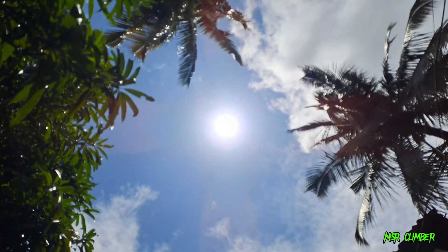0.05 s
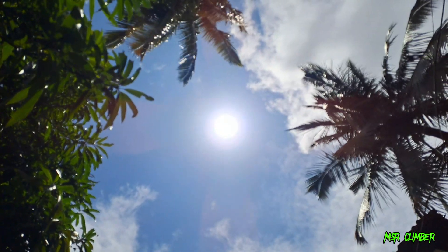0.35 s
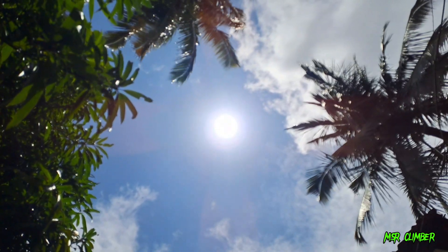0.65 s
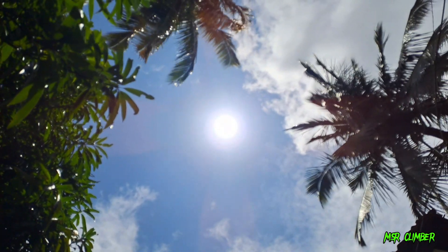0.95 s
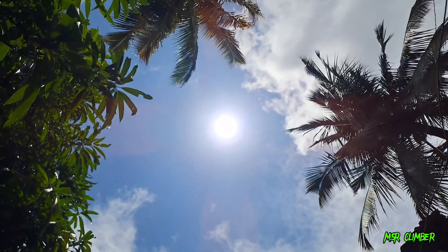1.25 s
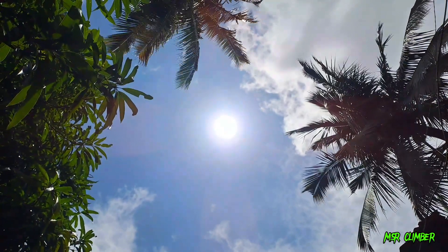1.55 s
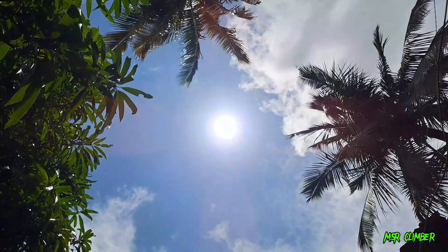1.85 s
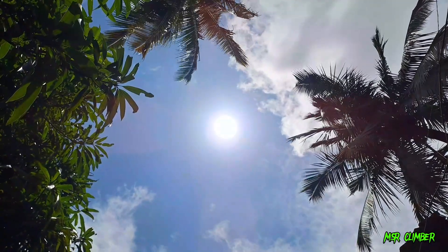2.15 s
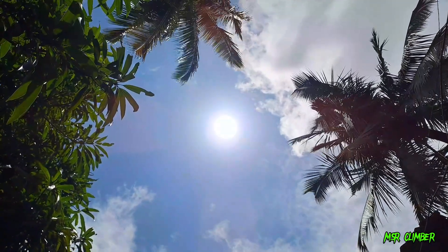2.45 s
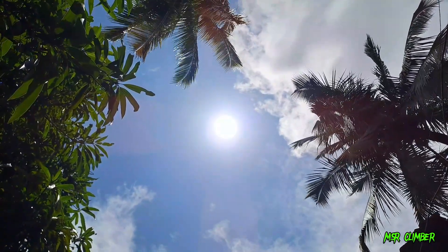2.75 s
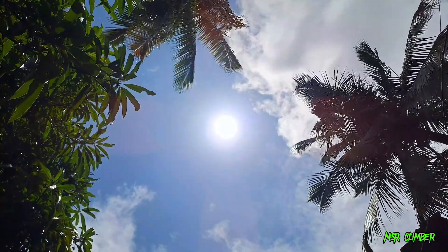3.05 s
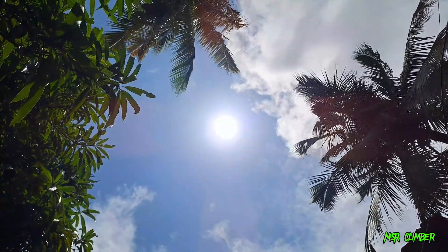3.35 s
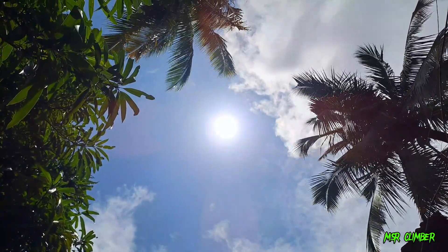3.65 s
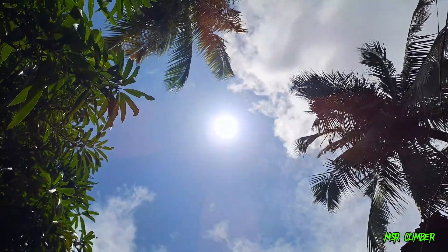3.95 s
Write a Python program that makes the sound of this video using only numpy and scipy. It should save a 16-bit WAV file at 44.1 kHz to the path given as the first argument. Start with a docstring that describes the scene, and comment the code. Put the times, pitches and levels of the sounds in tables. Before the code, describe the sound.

Wind rustles steadily through a grove, palm fronds hissing on the right and broad leaves softer on the left. Gusts rumble and thump on the microphone in turns, while a small distant bird pipes short notes.

```python
"""A grove in steady wind: palm fronds hiss on the right and broad leaves rustle more softly on the left,
over a far roar of air in the trees. Swirls of air rumble on the left and right microphones in turn,
and single swirls land as soft thumps. A small, distant bird pipes short notes, singly or in
falling runs, which echo among the trees."""
import sys
import numpy as np
from scipy import signal
from scipy.fft import rfft, irfft, next_fast_len
from scipy.io import wavfile
from scipy.ndimage import uniform_filter1d, map_coordinates

SR = 44100
rng = np.random.default_rng(int(sys.argv[2]) if len(sys.argv) > 2 else 0)


def master(y):
    """Save y as 16-bit WAV."""
    cut = np.clip(np.atleast_2d(y).T, -1, 1)
    pcm = np.round(cut * 32767)  # scale
    wavfile.write(sys.argv[1], SR, pcm.astype(np.int16))


N = 176400  # 4 seconds


def amp(db):
    """Turn decibels into a number to multiply a sound by."""
    return 10 ** (np.asarray(db) / 20)


def unit(x):
    """Scale a sound to an average strength (rms) of 1."""
    return x / np.sqrt(np.mean(x ** 2) + 1e-20)


def curve(rows):
    """Join (time, value) points with straight lines, one value per sample."""
    return np.interp(np.arange(N) / SR, *np.transpose(rows))


def wobble(per_second, samples=N):
    """A smooth curve that glides through so many random values a second."""
    return map_coordinates(rng.standard_normal(4096), [np.arange(samples) * per_second / SR], mode="wrap")


def filtered(x, gain_at):
    """Turn each frequency of a sound up or down by gain_at(frequency)."""
    size = next_fast_len(N + SR // 2)
    hz = np.fft.rfftfreq(size, 1 / SR)
    return irfft(rfft(x, size) * gain_at(hz), size)[..., :N]


def coloured(x, tone):
    """Shape a sound with a table of (frequency, level) points, then scale it to strength 1."""
    points_hz, db = np.transpose(tone)
    return unit(filtered(x, lambda hz: amp(np.interp(np.log(hz + 1), np.log(points_hz + 1), db))))


def patchy_noise(depth_db):
    """A hiss in which patches of low and high sound drift louder and softer."""
    grid = signal.stft(rng.standard_normal(N), nperseg=512)[2]
    patches = uniform_filter1d(rng.standard_normal(grid.shape), size=8, axis=0)  # smooth over frequency
    patches = uniform_filter1d(patches, size=16, axis=1)  # and over time
    noise = signal.istft(grid * amp(depth_db * unit(patches)), nperseg=512)[1]
    return unit(noise[:N])


def add(track, start_s, sound):
    """Mix a sound into a track at the given time."""
    at = round(start_s * SR) + np.arange(sound.shape[-1])
    inside = (at >= 0) & (at < N)
    track[..., at[inside]] += sound[..., inside]


# Tone of the far wind (frequency [Hz], relative level [dB])
ROAR_TONE = [(20, -5), (45, -10.5), (110, 0.5), (200, -3), (380, -4.5), (700, -8), (1100, -13.5),
             (1800, -39), (4000, -50)]

def far_roar(level_db=-45.5):
    """Wind in far trees makes a low, steady roar, the same on both sides."""
    return amp(level_db) * coloured(patchy_noise(depth_db=1.0), ROAR_TONE)


def among_trees(call, direct_db, echo_db, fade_s=0.7, build_s=0.014):
    """A call arrives directly and as an echo off trunks and treetops. Levels are (left, right)."""
    t = np.arange(SR) / SR
    fade = amp(-60 * t / fade_s)
    build = 1 - np.exp(-t / build_s)
    bounces = rng.standard_normal((2, SR)) * fade * build
    echo = signal.fftconvolve(call[None], bounces, axes=1)
    echo *= np.linalg.norm(call) / np.linalg.norm(echo, axis=1, keepdims=True)  # same energy as the call
    direct = np.pad(call, (0, SR - 1))
    return amp(direct_db)[:, None] * direct + amp(echo_db)[:, None] * echo


# The bird's notes, before they travel through the trees
# (time [s], pitch [Hz], level [dB], overtone level compared with the note [dB])
BIRD_NOTES = [(-.04, 3570, -42, -10), (.138, 3475, -37, -8), (.29, 3455, -40, -7), (.882, 3575, -29.5, -16),
              (1.622, 3615, -31.5, -8), (1.726, 3560, -29, -14), (2.67, 3640, -34.5, -9),
              (2.78, 3475, -36, -8), (3.08, 3645, -31, -11), (3.192, 3545, -33.5, -11),
              (3.33, 3490, -34, -12), (3.457, 3445, -39, -13), (3.875, 3575, -33, -9)]

def bird(note_s=0.06, fade_in_s=0.02, fade_out_s=0.03, flutter_db=2):
    """Each note is a short, fluttering whistle with a softer overtone at twice its pitch."""
    arch, sag, waver = 0.016, 0.006, 0.008  # shares of the pitch: low at both ends, falling, unsteady
    song = np.zeros((2, N))
    t = np.arange(SR // 8) / SR
    position = np.clip(t / note_s, 0, 1) * 2 - 1  # -1 at the note's start, +1 at its end
    fade = np.clip(t / fade_in_s, 0, 1) * np.clip((note_s - t) / fade_out_s, 0, 1)
    for start_s, hz, db, overtone_db in BIRD_NOTES:
        pitch = hz * (1 - arch * position ** 2 - sag * position + waver * wobble(170, len(t)))
        phase = 2 * np.pi * np.cumsum(pitch) / SR
        loudness = np.sqrt(2) * amp(db + flutter_db * wobble(170, len(t))) * fade
        whistle = loudness * np.sin(phase)
        overtone = loudness * amp(overtone_db) * np.sin(2 * phase)
        add(song, start_s, among_trees(whistle, direct_db=(-20.5, -2), echo_db=(-6, -4)))
        add(song, start_s, among_trees(overtone, direct_db=(-5, -8.5), echo_db=(-0.5, -1.5)))
    return song


# Single swirls of air (time [s], peak level [dB], pitch [Hz], side [0 left, 1 right])
AIR_THUMPS = [(.218, -21.5, 110, 0), (.292, -14, 108, 0), (0.491, -13.5, 112, 1), (0.671, -21, 63, 1),
              (0.769, -27.5, 60, 0), (1.417, -25, 60, 0), (1.638, -27, 55.4, 0), (2.281, -22.5, 55.4, 0),
              (2.378, -20.5, 94, 0), (2.592, -22, 72, 0), (2.868, -23, 77, 0), (3.402, -21.5, 64, 0),
              (3.602, -30, 54.6, 0), (3.643, -30, 68.5, 0)]

def air_thumps(half_width_cycles=0.28):
    """A sharp swirl hits one microphone and gives it one short swing of pressure."""
    mics = np.zeros((2, N))
    t = np.arange(-SR // 20, SR // 20) / SR
    for time_s, db, hz, side in AIR_THUMPS:
        push = amp(db) / np.cosh(t * hz / half_width_cycles)
        swing = np.cos(2 * np.pi * hz * t + rng.uniform(0, 2 * np.pi))
        add(mics[int(side)], time_s + t[0], push * swing)
    return mics


# Strength of the swirling air at each microphone (time [s], level [dB])
LEFT_SWIRLS = [(0, -38), (.22, -39), (.4, -45), (.75, -43), (1.0, -45.5), (1.35, -52.5), (1.7, -45),
               (2.24, -51), (2.27, -37), (2.39, -27.5), (2.6, -31.5), (2.73, -39), (2.82, -36.5),
               (2.86, -31.5), (3.03, -27), (3.13, -38.5), (3.22, -49), (3.5, -43), (3.62, -43), (3.75, -47),
               (4, -49)]
RIGHT_SWIRLS = [(0, -49), (.08, -40), (.24, -38.5), (.31, -29), (.37, -40), (.44, -25), (.53, -39),
                (.68, -40), (.82, -46.5), (1.2, -47.5), (2.301, -55), (4, -51)]
# Tone of its rumble (frequency [Hz], relative level [dB])
RUMBLE_TONE = [(12, -42), (22, -24), (36, -10.5), (55, 2), (80, -3), (115, -14), (160, -28), (300, -43),
               (900, -80)]

def microphone_rumble(puff_db=1.1):
    """Air swirls over each microphone separately, so each has its own deep, puffing rumble."""
    mics = np.zeros((2, N))
    for mic, swirls in zip(mics, (LEFT_SWIRLS, RIGHT_SWIRLS)):
        rumble = coloured(rng.standard_normal(N), RUMBLE_TONE)
        chance_swells = np.sqrt(np.abs(uniform_filter1d(rumble ** 2, size=4000)) + 1e-9)
        even_rumble = rumble / chance_swells
        mic += amp(curve(swirls) + puff_db * wobble(25)) * even_rumble
    return mics


# Strength of the wind in the leaves (time [s], relative level [dB])
WIND_STRENGTH = [(0, -43.5), (.3, -44), (.48, -44), (.6, -43.5), (.8, -42), (.98, -43), (1.13, -43),
                 (1.55, -43), (1.8, -42.5), (1.95, -43.5), (2.35, -44), (2.8, -43.9), (3.3, -44.5),
                 (4, -44.8)]

def rustle(tone, flutter_db, ticks_per_s=900, tick_spread_db=2, tick_db=-10.5):
    """Countless leaves hiss and nearer ones tick as they touch. More wind: louder, with more ticks."""
    wind_db = curve(WIND_STRENGTH)
    level_db = wind_db + flutter_db * wobble(14)
    gust = amp(level_db - wind_db.mean())
    touches = rng.random(N) < ticks_per_s * gust / SR
    ticks = unit(touches * rng.standard_normal(N) * amp(tick_spread_db * rng.standard_normal(N)))
    hiss = patchy_noise(depth_db=0.5)
    return amp(level_db) * coloured(hiss + amp(tick_db) * ticks, tone)


# Tone of the broad leaves (frequency [Hz], relative level [dB])
LEAF_TONE = [(300, -15.5), (900, -1), (1600, 0), (2400, -1), (3300, 0.5), (4200, -4), (5200, -5.5),
             (6000, -7.5), (7000, -7), (8000, -10), (9200, -14), (10500, -11), (12500, -13), (14000, -15),
             (15500, -17)]

def broad_leaves(boost_db=3.5):
    """The broad leaves of bushes brush together in a soft rustle."""
    return amp(boost_db) * rustle(LEAF_TONE, flutter_db=0.87)


# Tone of the palm fronds (frequency [Hz], relative level [dB])
PALM_TONE = [(300, -9), (900, -6), (1600, -6.5), (2400, -4.5), (3300, -2), (4500, 1.5), (5500, -3.5),
             (6400, -7), (7300, -13.5), (8200, -20), (9300, -17.5), (10500, -15.5), (11700, -11),
             (12800, -15.5), (13800, -24.5), (15500, -25)]

def palm_fronds(boost_db=8.5):
    """The leaflets of palm fronds brush together in a bright hiss."""
    return amp(boost_db) * rustle(PALM_TONE, flutter_db=0.48)


def scene():
    """Roar, bird and air on the microphones, with broad leaves on the left and palm on the right."""
    leaves = np.array([broad_leaves(), palm_fronds()])
    return far_roar() + bird() + air_thumps() + microphone_rumble() + leaves


def record(dry, top_hz=15750):
    """The very highest treble is cut away."""
    return filtered(dry, lambda hz: hz < top_hz)


dry = scene()
out = record(dry)
master(out)
```